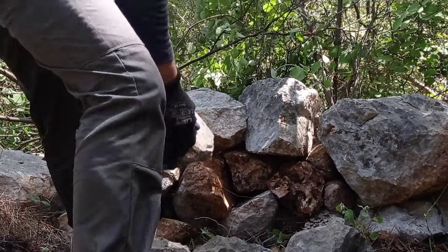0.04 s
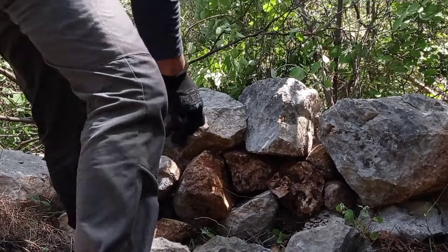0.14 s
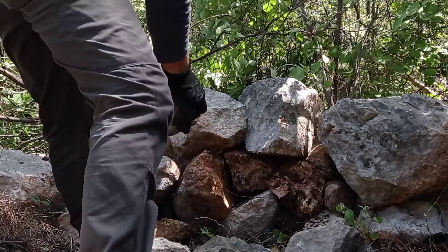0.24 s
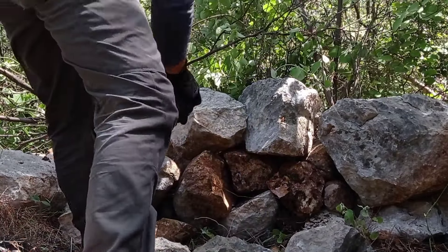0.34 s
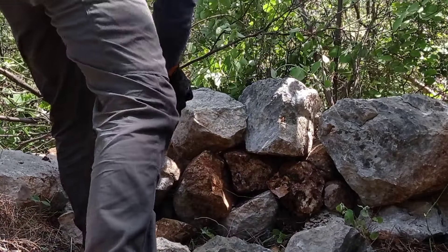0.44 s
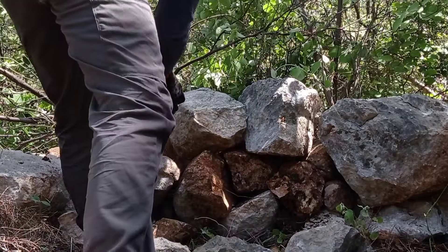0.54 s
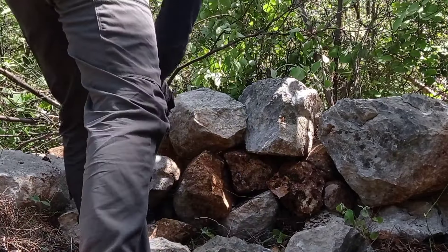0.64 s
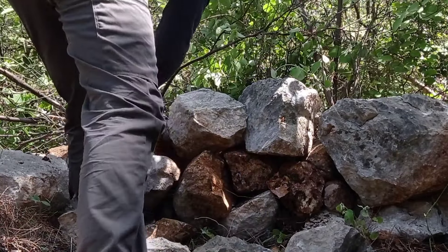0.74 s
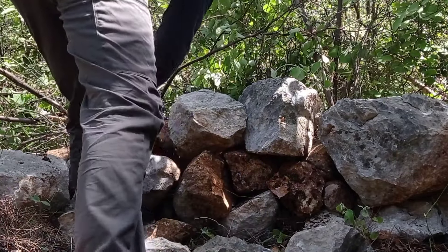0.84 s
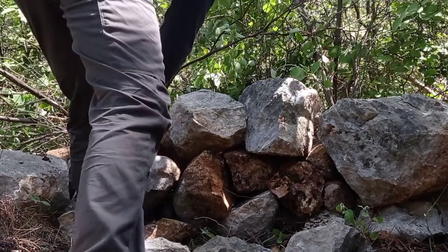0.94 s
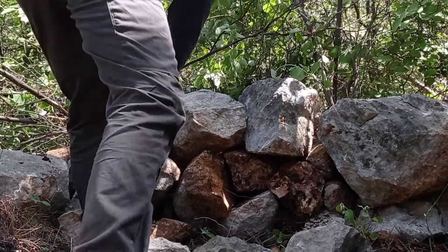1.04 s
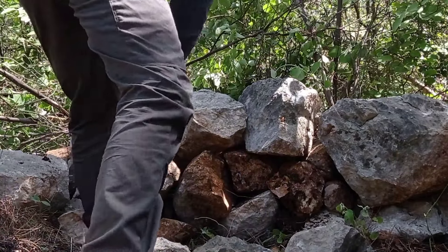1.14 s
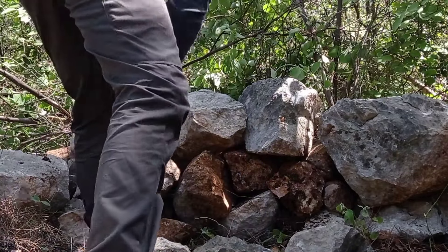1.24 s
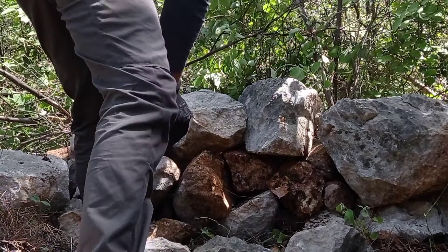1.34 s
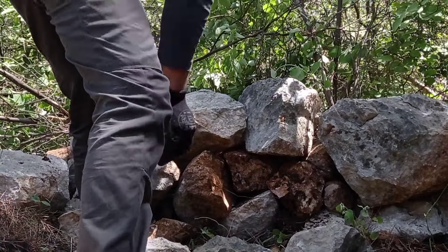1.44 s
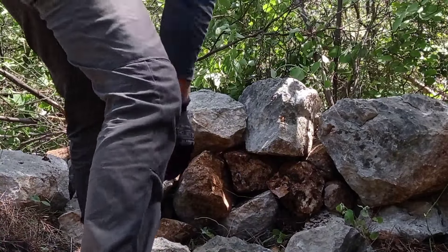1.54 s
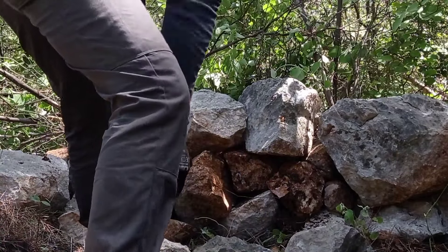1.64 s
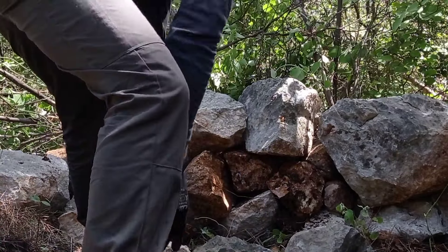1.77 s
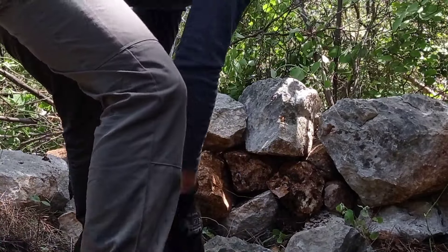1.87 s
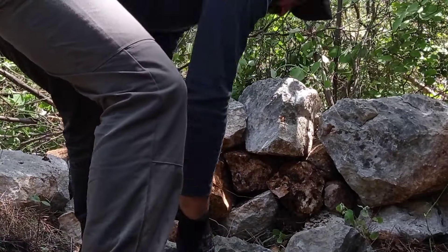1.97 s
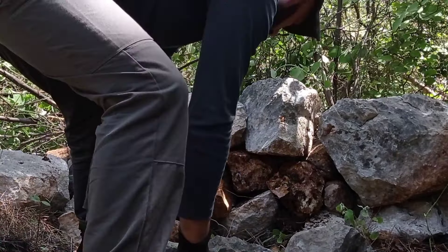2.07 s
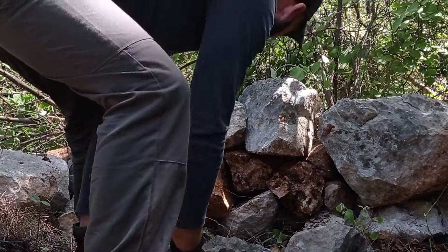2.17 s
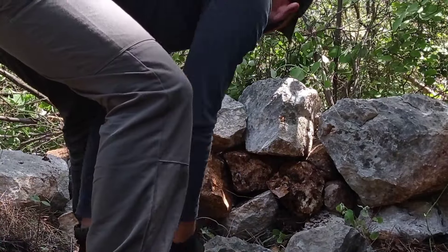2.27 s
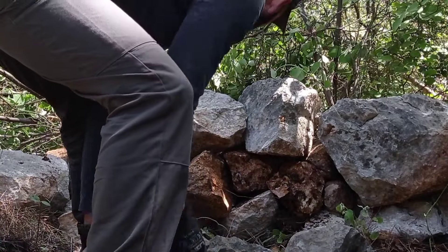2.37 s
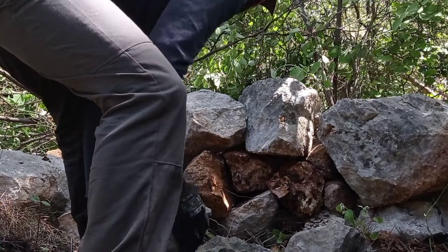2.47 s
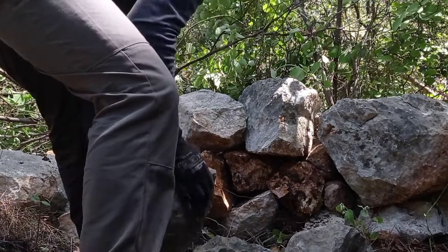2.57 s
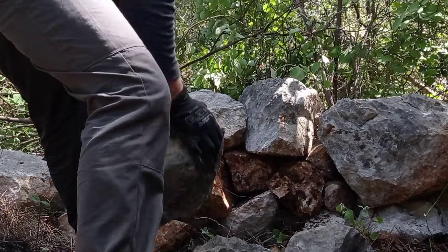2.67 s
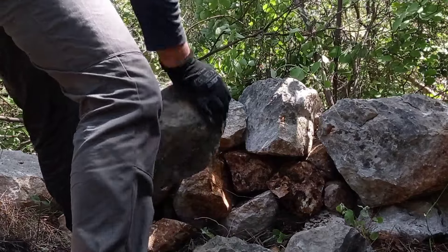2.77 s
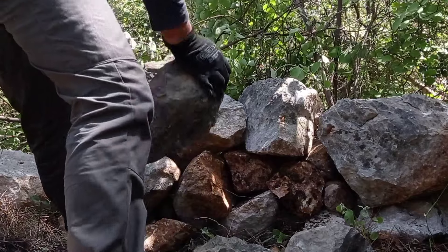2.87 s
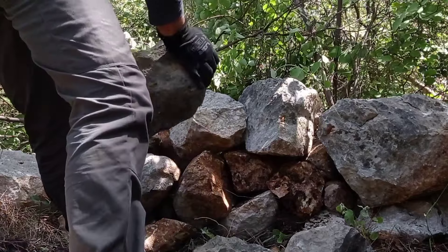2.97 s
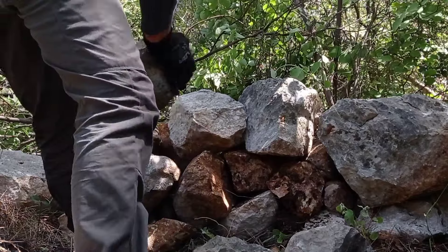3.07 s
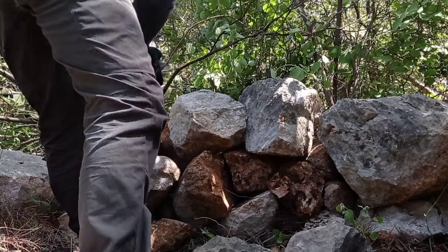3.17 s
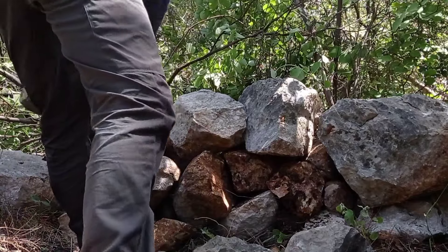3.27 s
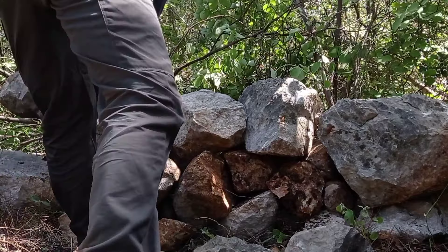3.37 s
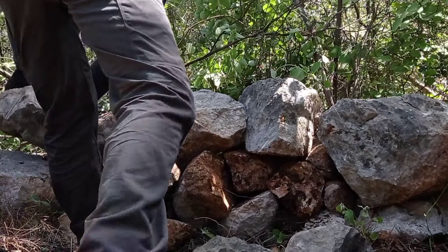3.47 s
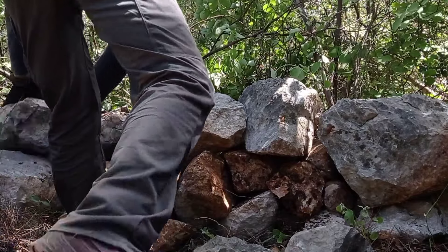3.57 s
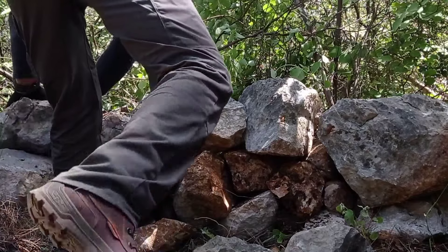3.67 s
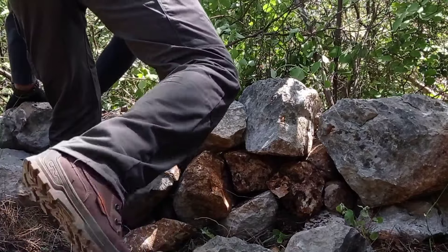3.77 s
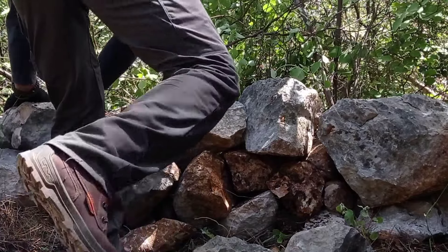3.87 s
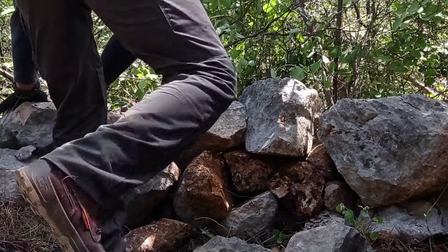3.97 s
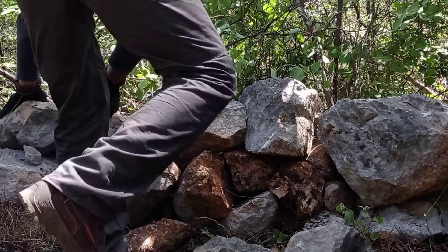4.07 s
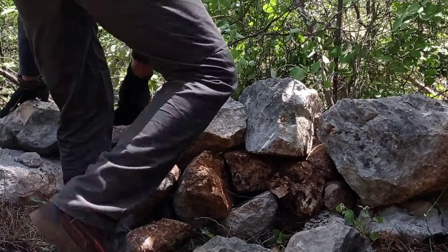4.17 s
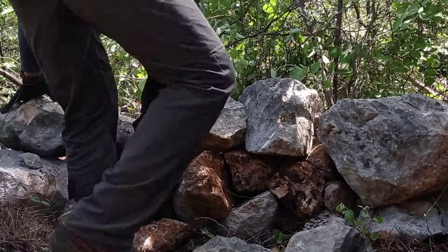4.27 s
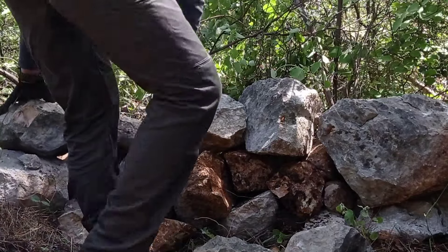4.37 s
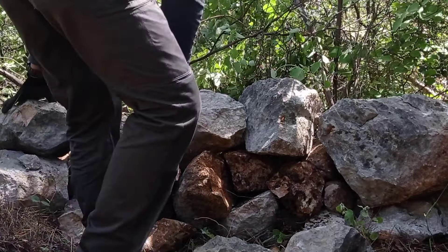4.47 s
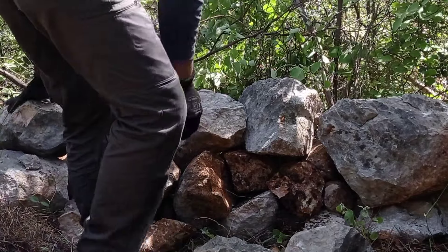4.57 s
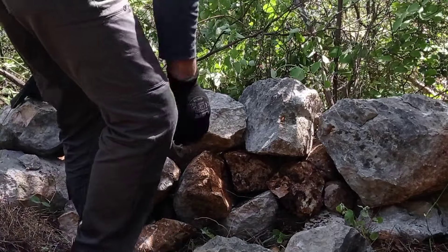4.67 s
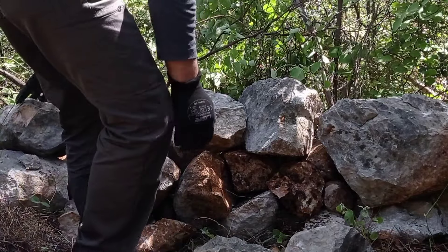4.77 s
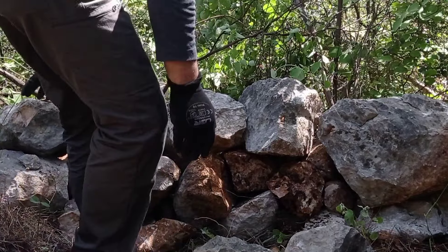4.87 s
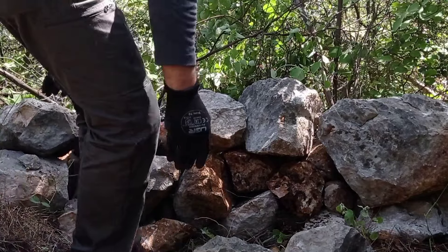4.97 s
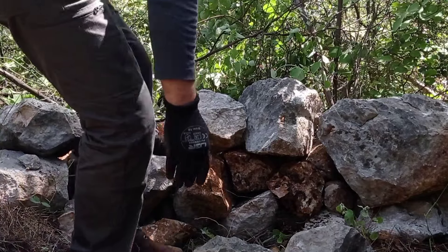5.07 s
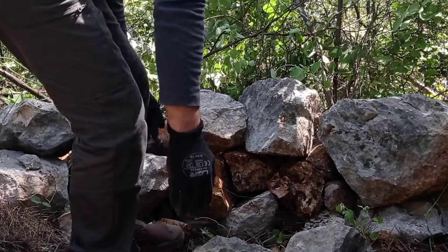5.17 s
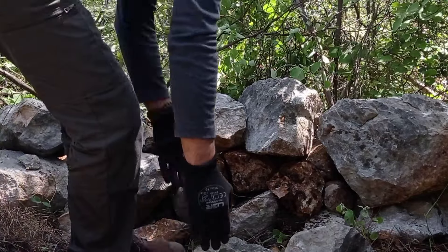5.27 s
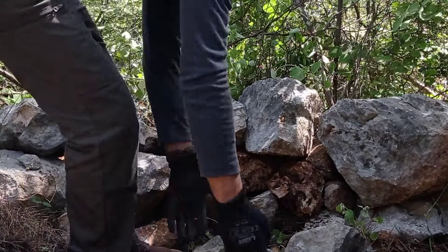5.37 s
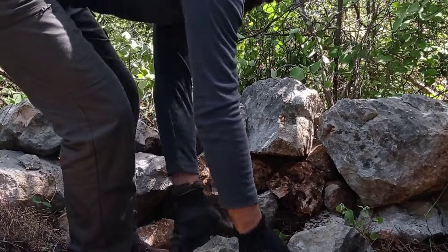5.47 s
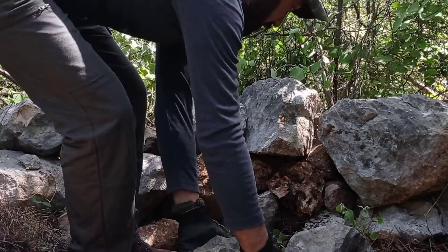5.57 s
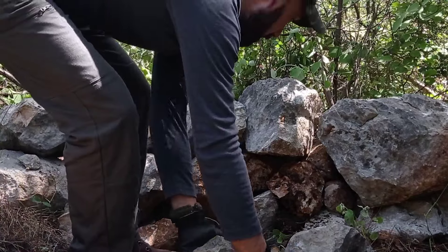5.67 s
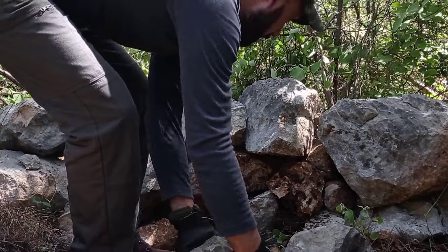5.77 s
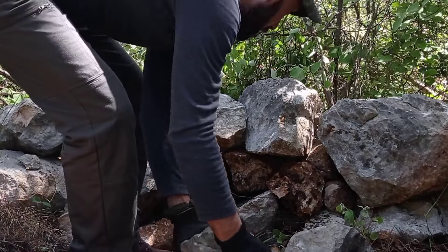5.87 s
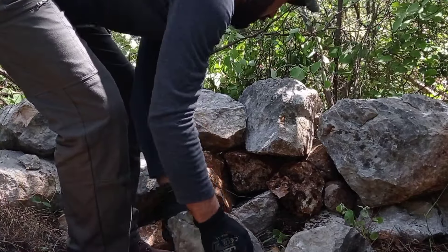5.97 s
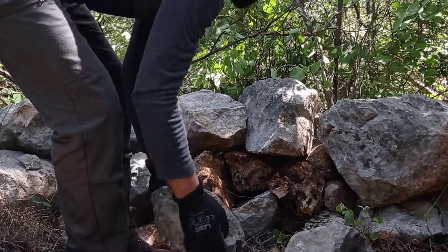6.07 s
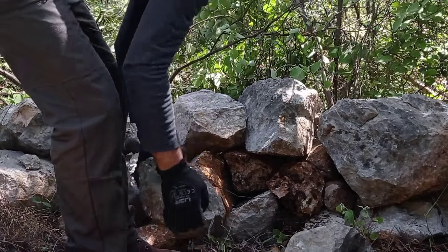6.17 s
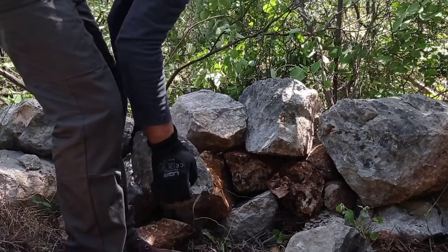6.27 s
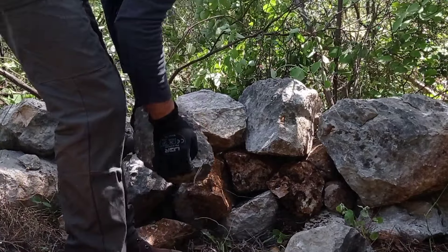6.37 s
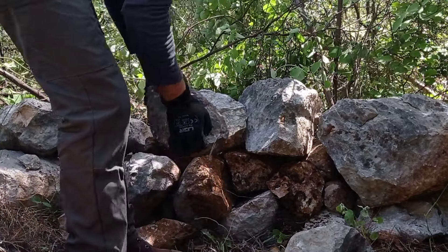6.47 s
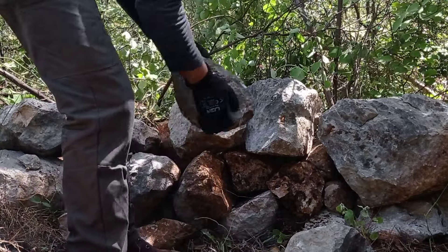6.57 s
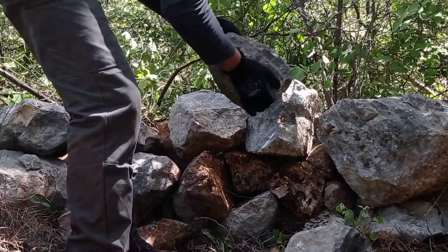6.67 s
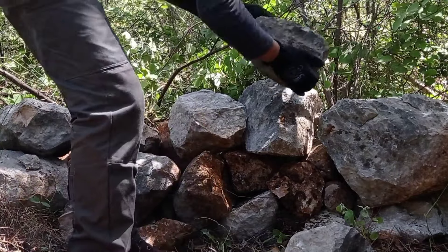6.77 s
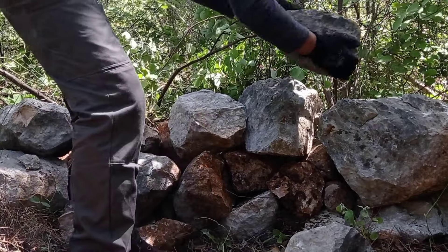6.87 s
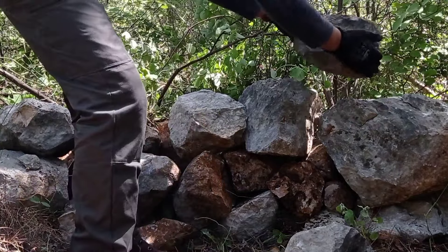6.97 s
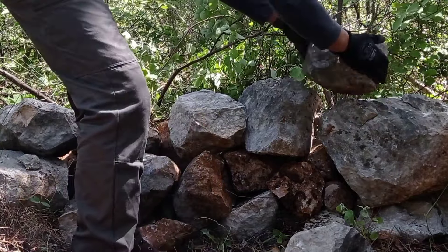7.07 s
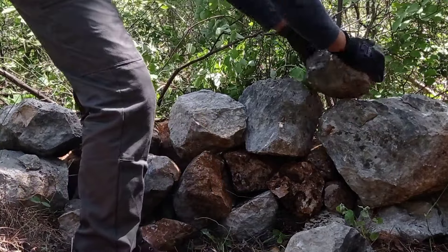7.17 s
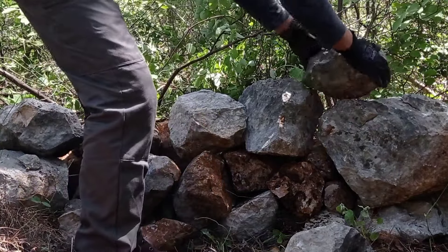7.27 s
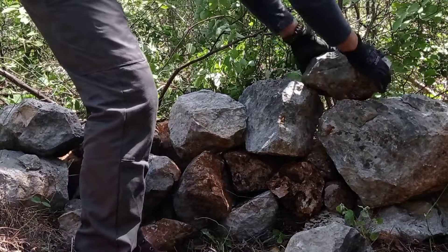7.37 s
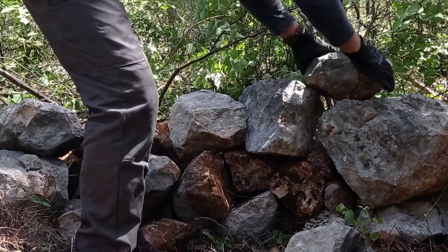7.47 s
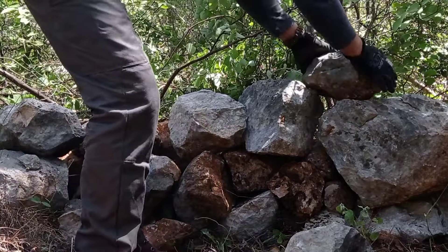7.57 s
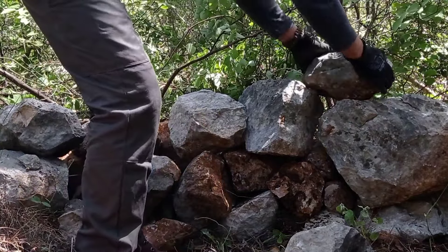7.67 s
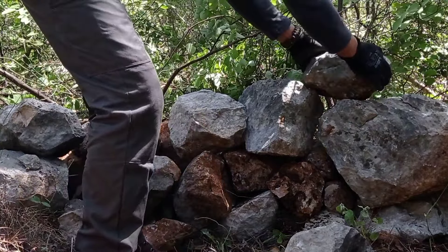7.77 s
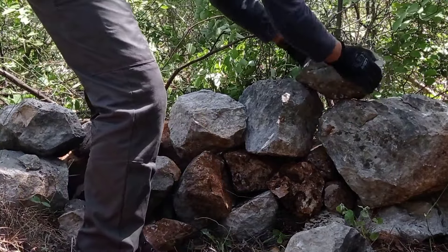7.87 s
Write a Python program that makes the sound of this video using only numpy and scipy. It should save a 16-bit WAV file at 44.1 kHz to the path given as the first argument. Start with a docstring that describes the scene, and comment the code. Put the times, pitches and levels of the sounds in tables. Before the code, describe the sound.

Three sharp stone-on-stone clacks with smaller settling knocks, amid soft crunching steps and faint bird whistles in a quiet wood.

```python
"""A dry-stone wall going up in a wood, heard on one microphone near the work, over the low hum of the air.
A heavy rock clacks down in the first second. Clothes rustle, twigs and grit snap under boots, and far off
one bird whistles a level note and another sings three thin phrases. At 3.5 s a second rock lands, tips on
its edges and settles. More steps and another whistle follow; from 7.1 s the last rock knocks into place."""
import sys
import numpy as np
from scipy import signal
from scipy.fft import rfft, irfft, next_fast_len
from scipy.io import wavfile
from scipy.ndimage import uniform_filter1d, map_coordinates

SR = 44100
rng = np.random.default_rng(int(sys.argv[2]) if len(sys.argv) > 2 else 0)


def wrap_up_sound(samples):
    """Save the sound to the file named by the first command line argument, as 16-bit audio."""
    columns = np.atleast_2d(samples).T
    # keep every value between -1 and 1, then stretch to whole-number steps
    tamed = np.clip(columns, -1, 1)
    steps = np.round(tamed * 32767).astype(np.int16)
    wavfile.write(sys.argv[1], SR, steps)


N = 349624

# Stone on stone, near the microphone. Each row: start in seconds, strength in dB, main ring in Hz,
# then the weight behind the blow, the hardness of the contact and the grit caught in it, all in dB.
KNOCKS = [(0.7398, -10, 1100, -11, 13, 16), (0.7432, 14.5, 850, -6, 13, 8.5),
          (0.8101, 23, 988.4, -6, -2.5, -10.5), (.834, 4.5, 598, 0, -1.5, -3), (3.531, 17, 800, 3, 2, 2),
          (3.555, 17, 966, -10, 4.5, 11), (3.586, 5.5, 278, 6, 5, -1), (3.6283, 2.5, 756, 2.5, -3, -19),
          (3.727, 9, 724, 1, -4, -5), (4.414, 4, 660, -2, 0, -11), (4.439, -15.5, 557, 11.5, 2.5, 3),
          (5.872, -14.5, 554, 1.5, 3, 12.5), (7.1176, 18.5, 298, -2, 10.5, -3.5),
          (7.1445, -2.5, 490, 1.5, 4, -5), (7.199, -15, 600, 1, 4.5, 7),
          (7.3866, 6.5, 661, -4, -5.5, -20.5), (7.43, -14, 485, 9, -6, 12),
          (7.451, -11.5, 605, 6.5, -10, 9), (7.79, -17, 666, -1.5, -12, 1),
          (7.831, -14, 520, 0.5, -15.5, -6), (7.877, -6.5, 680, -1.5, -17, 8.5),
          (7.904, 1.5, 550, -5, 5.5, -9), (7.9103, -2, 270, -6.5, 3, -11)]
# The spectrum of an average blow. Each row: frequency in Hz, level in dB.
BLOW_SPECTRUM = [(25, -48), (50, -23.5), (78, -4), (125, 2), (310, -.5), (590, 2), (950, -1.5), (1120, -5),
                 (1450, -12), (1850, -17), (3500, -30), (6400, -28.5), (8200, -38), (12500, -54),
                 (15500, -46)]
# How weight, hardness and grit colour it. Each row: frequency in Hz, dB gained per dB of that quality.
WEIGHT_TILT = [(125, 1.52), (310, 0.12), (590, 0.33), (950, -0.87), (1850, 0.02), (3500, 0)]
HARDNESS_TILT = [(1000, 0), (1450, 0.6), (1850, 0.9062), (3500, 1), (6400, 0)]
GRIT_TILT = [(1850, 0), (3500, 0.81), (6400, 1), (15500, 0.52)]


def stones():
    """Each contact is a heavily damped pulse; weight gives a thud, hard faces a crack, grit a fizz."""
    out = np.zeros(N)
    hz, blow_db = np.transpose(BLOW_SPECTRUM)
    for start, db, ring_hz, weight, hardness, grit in KNOCKS:
        colour = blow_db + weight * along(WEIGHT_TILT, hz)
        colour += hardness * along(HARDNESS_TILT, hz)
        colour += grit * along(GRIT_TILT, hz)
        blow = pulse(list(zip(hz, db + colour)))
        blow = signal.fftconvolve(blow, crush(seconds=.0036, rough_hz=1490))
        blow = signal.fftconvolve(blow, rock_ring(ring_hz, main_db=1.5, high_db=-5.5, neighbour_db=-4.5))
        rattle_db = -8 - .29 * db  # firm blows seat the rock and rattle less
        add(out, start, outdoors(blow, ground=.4, wall_db=rattle_db, wood_db=-28))
    return out


# The brief ring of a hand-sized rock. Each row: frequency in Hz, relative level in dB, t60 in seconds.
ROCK_MODES = [(2450, -6, .015), (2917, 2.5, .022), (3720, 1.5, .02), (4400, -3.5, .02), (4700, -5.5, .02),
              (5800, -2.5, 0.018), (6340, -1, 0.012)]


def rock_ring(main_hz, main_db, high_db, neighbour_db):
    """A blow plus the rock's main resonance, its high modes and the low modes of the rocks it leans on."""
    t = np.arange(SR // 12) / SR

    def mode(hz, db, t60):
        decay = amp(db - 60 * t / t60)
        return decay * np.cos(2 * np.pi * hz * t) * 2 * np.log(1000) / (t60 * SR)  # resonance peaks at db

    ring = mode(main_hz, main_db, t60=18 / main_hz)  # dies in 18 cycles
    for hz, db, t60 in ROCK_MODES:
        ring += mode(hz, high_db + db + 2 * rng.standard_normal(), t60)
    for hz in np.geomspace(260, 2000, num=7) * np.exp(.11 * rng.standard_normal(7)):
        ring += rng.choice([-1, 1]) * mode(hz, neighbour_db, t60=.054)
    ring[0] += 1  # the blow itself
    return ring


def crush(seconds, rough_hz, size=2048):
    """Contact force: one clean push below rough_hz, a burst of crumbling grains above."""
    t, hz = np.arange(size) / SR, np.fft.rfftfreq(size, 1 / SR)
    burst = rng.standard_normal(size) * np.exp(-t / seconds)
    grains = rfft(burst / np.linalg.norm(burst))
    push = np.exp(-2j * np.pi * hz * seconds / 2)
    rough_share = 1 / (1 + (rough_hz / (hz + 1)) ** 4)
    return irfft(np.sqrt(1 - rough_share) * push + np.sqrt(rough_share) * grains)[:size // 2]


# Breaks underfoot. Each row: start in seconds, strength in dB, thinness (fizz over crack) in dB.
SNAPS = [(1.7455, -37.5, 14.5), (2.007, -36.5, -11.5), (2.07, -32.5, -9.5), (2.116, -25, -3.5),
         (3.619, -23.5, -11), (3.681, -26.5, 3.5), (3.815, -34.5, 12), (3.9295, -15.5, -4.5),
         (3.937, -17.5, -2.5), (4.0104, -21, -6.5), (4.029, -20, -9), (4.0345, -20.5, -12),
         (4.129, -29, -5.5), (5.002, -35.5, 10), (5.2536, -30.5, 6.5), (5.298, -20, 13), (6.006, -29, -7.5),
         (6.38, -35.5, 2), (6.706, -34.5, 10), (7.6376, -26.5, 5)]


def snaps():
    """Dry twigs and crumbs of rock break with thin, bright ticks."""
    out = np.zeros(N)
    for start, db, thinness in SNAPS + crumbs():
        crack, fizz = db - thinness / 2, db + thinness / 2
        top = fizz + np.clip(thinness, -8, 8)  # thin twigs reach higher than thick ones
        tick = pulse([(100, crack - 18), (700, crack - 14), (1500, crack - 1), (3800, crack + 1),
                      (6500, fizz + 2), (8500, fizz - 7), (12500, top - 26), (15500, top - 17)])
        tick = signal.fftconvolve(tick, crush(seconds=.0045, rough_hz=894))
        add(out, start, outdoors(tick, ground=.14, wall_db=-13.5, wood_db=-19))
    return out


def crumbs(per_second=2.7, db=-44.5, spread_db=2, max_thinness_db=11):
    """Faint chance ticks, likelier the more the body moves: rows like those of SNAPS."""
    effort = np.cumsum(movement())
    draws = rng.random((64, 3))[:round(per_second * N / SR)]
    rows = []
    for when, size, thin in draws:
        start = np.searchsorted(effort, when * effort[-1]) / SR
        rows.append((start, db + spread_db * (2 * size - 1), thin * max_thinness_db))
    return rows


# Boots and gloves scraping by the wall. Each row: start and length in seconds, relative level in dB.
SCUFFS = [(0.693, .06, -65), (0.738, 0.19, -58), (1.333, 0.045, -75.5), (1.415, 0.049, -73),
          (1.683, 0.08, -67.5), (1.966, .28, -61), (3.43, .34, -63), (4.099, 0.13, -66.5),
          (4.379, .2, -68.5), (4.61, 0.078, -66.5), (5.24, 0.097, -64), (5.822, .08, -66),
          (6.497, 0.18, -73.5), (6.984, 0.24, -63.5), (7.426, 0.048, -71.5)]
# Weight shifting on soil and loose rock. Each row: start and length in seconds, level in dB, pitch in Hz.
SHIFTS = [(0, 0.28, -68.5, 297), (2.292, 1.22, -63, 107.4), (3.541, 0.38, -54, 123),
          (3.979, 0.86, -61.5, 118), (5.131, .5, -58.5, 279), (5.513, 0.24, -61, 139),
          (7.433, 0.072, -57, 140), (7.812, 0.19, -51.5, 246)]
# The crackle of needles and grit. Each row: frequency in Hz, relative level in dB.
LITTER_SPECTRUM = [(200, -0.5), (1000, -2), (2200, -2.5), (4000, 1), (5200, -1.5), (6600, 0.5),
                   (8500, -12.5), (13000, -26.5), (15500, -17)]


def footwork():
    """Soles grind the litter into crackle; shifting weight makes the ground rumble softly."""
    scrape, rumble = np.zeros(N), np.zeros(N)
    for start, seconds, db in SCUFFS:
        add(scrape, start, amp(db + 1) * swell(seconds) ** .74)
    for start, seconds, db, hz in SHIFTS:
        press = np.zeros(N)
        add(press, start, amp(db) * swell(seconds))
        hollow = [(hz / 4, -28), (hz * .7, -4), (hz, 0), (hz * 1.25, -3),
                  (hz * 1.8, -18), (hz * 5, -36), (hz * 20, -70)]
        rumble += press * coloured(rng.standard_normal(N), hollow)
    grains = crackle(rate=4300, spread_db=3) * amp(3 * wobble(60))  # grains come in clumps
    crunch = scrape * patchy(coloured(grains, LITTER_SPECTRUM), depth_db=3.5)
    return rumble + outdoors(crunch, ground=.3, wall_db=-10.5, wood_db=-10.5)[:N]


# The hiss of work clothes. Each row: frequency in Hz, relative level in dB.
FABRIC_SPECTRUM = [(300, -8.5), (1200, -2.5), (3000, -4.5), (5000, -1), (6400, 4.5), (8000, -3),
                   (10000, -15.5), (13000, -23), (15500, -18)]


def cloth():
    """Fabric rubs in uneven little strokes, dull and bright folds taking turns."""
    strokes = amp(2.6 * wobble(18))
    friction = rng.standard_normal(N) + .5 * crackle(rate=1500, spread_db=2)
    bright = amp(3) * coloured(friction, FABRIC_SPECTRUM)
    dull = amp(-8 + 5.4 * wobble(16)) * coloured(crackle(rate=3000, spread_db=2.5), LITTER_SPECTRUM)
    return movement() * patchy(strokes * (bright + dull), depth_db=3)


# Trousers and sleeves in lifting, stepping and lifting again.
# Each row: one move, as points of time in seconds and level in dB.
MOVES = [
    [(1.3, -87), (2.04, -86.5), (2.18, -81), (2.33, -83), (2.63, -80.5), (3.26, -85), (3.33, -85)],
    [(3.36, -84.5), (3.46, -82.5), (3.6, -74), (3.93, -81), (4.48, -73.5), (5.28, -82.5), (5.48, -75)],
    [(5.8, -77.5), (6.02, -85.5), (6.38, -89), (6.58, -79), (7.2, -78), (7.58, -88.5), (7.93, -85)],
]


def movement():
    """How strongly the body moves, as the gain of its rustle."""
    t = np.arange(N) / SR
    return sum(amp(np.interp(t, *np.transpose(move), left=-120, right=-120)) for move in MOVES)


# A rising note and a falling hook. Each row: seconds into the phrase, pitch in Hz, relative level in dB.
PHRASE = [(0, 4400, -18), (.06, 5100, 0), (.155, 4850, -10), (.165, 4900, -40), (.17, 6500, -40),
          (.185, 6150, -1), (.26, 5550, 1), (.285, 4200, 1), (.305, 3750, 1), (.335, 4400, -2),
          (.35, 4600, -25)]
# The small bird's phrases. Each row: start in seconds, relative level in dB.
SONG = [(1.861, -92.5), (2.29, -65), (2.735, -70.5)]
# A second bird's level notes. Each row: start and length in seconds, pitch in Hz, relative level in dB.
WHISTLES = [(1.762, .23, 1924, -81), (5.278, 0.13, 1947, -73)]


def birds():
    """Two birds whistle far from the microphone, their thin tones blurred by the trees."""
    times, hz, db = np.transpose(PHRASE)
    t, direct = np.arange(int(times[-1] * SR)) / SR, np.zeros(N)
    for start, level in SONG:
        pitch = np.interp(t, times, hz) * (1 + .012 * wobble(300)[:len(t)])
        envelope = amp(level + np.interp(t, times, db))
        add(direct, start, envelope * np.sin(2 * np.pi * np.cumsum(pitch) / SR))
    for start, seconds, note_hz, level in WHISTLES:
        envelope = amp(level) * swell(seconds)
        envelope *= amp(2.4 * wobble(35)[:len(envelope)] - 3)  # the note flutters
        pitch = note_hz * (1 + .013 * wobble(150)[:len(envelope)])
        add(direct, start, envelope * np.sin(2 * np.pi * np.cumsum(pitch) / SR))
    blurred = signal.fftconvolve(direct, tail([(2000, .67), (7000, .38)], seconds=.88))[:N]
    return .65 * direct + .7 * blurred


# The air all around the microphone. Each row: frequency in Hz, relative level in dB.
AIR_SPECTRUM = [(20, -22), (45, -13), (75, 0.5), (120, -0.5), (230, -15.5), (310, -8), (440, -15),
                (620, -12.5), (1150, -26.5), (2300, -31.5), (5000, -35.5), (6500, -29), (9500, -45),
                (15500, -49.5)]


def air():
    """The low, slowly wavering hush of the wooded slope."""
    level = amp(-66.5 + 1.5 * wobble(3))
    return level * patchy(coloured(rng.standard_normal(N), AIR_SPECTRUM), depth_db=4)


# Scatter in the nearby wall, and echo from the far trees. Each row: frequency in Hz, t60 in seconds.
WALL_DECAY = [(100, 0.24), (400, 0.11), (1000, .06), (3000, .05), (7000, 0.11), (15000, 0.018)]
WOOD_DECAY = [(100, .17), (500, .55), (1100, .43), (3000, .45), (7000, .35), (15000, .2)]


def outdoors(x, ground, wall_db, wood_db):
    """Sound reaches the microphone directly, off the rock beneath, and by way of the wall and trees."""
    path = amp(wood_db) * tail(WOOD_DECAY, seconds=1)
    add(path, 0, amp(wall_db) * tail(WALL_DECAY, seconds=.5))
    path[0] += 1
    bounce_s = .0021 * rng.uniform(.7, 1.3)  # varies from spot to spot
    path[round(SR * bounce_s)] += ground
    return signal.fftconvolve(x, path / np.linalg.norm(path))


def tail(decay, seconds):
    """A noise tail of energy 1, each frequency dying at its own speed."""
    hz, t, bands = signal.stft(rng.standard_normal(int(seconds * SR)), SR, nperseg=256)
    x = signal.istft(bands * amp(-60 * t / along(decay, hz)[:, None]), SR, nperseg=256)[1]
    x *= 1 - np.exp(-np.arange(len(x)) / SR / .0015)  # soft onset
    return x / np.linalg.norm(x)


def pulse(spectrum, size=4096):
    """The most compact causal pulse with this spectrum."""
    cepstrum = irfft(np.log(amp(along(spectrum, np.fft.rfftfreq(size, 1 / SR)))))
    cepstrum[1:size // 2] *= 2
    cepstrum[size // 2 + 1:] = 0
    return irfft(np.exp(rfft(cepstrum)))


def coloured(x, spectrum):
    """x through a spectrum of (Hz, dB) points, at rms 1."""
    size = next_fast_len(N + 8192)
    gain = amp(along(spectrum, np.fft.rfftfreq(size, 1 / SR)))
    return unit(irfft(rfft(x, size) * gain, size)[:N])


def patchy(x, depth_db):
    """x with gains that drift from band to band and moment to moment, at rms 1."""
    bands = signal.stft(x, nperseg=1024)[2]
    drift = uniform_filter1d(rng.standard_normal(bands.shape), size=5, axis=0)
    drift = uniform_filter1d(drift, size=7, axis=1)
    return unit(signal.istft(bands * amp(depth_db * unit(drift)), nperseg=1024)[1][:N])


def crackle(rate, spread_db):
    """Random tiny impulses of uneven size, about rate a second, at rms 1."""
    hits = rng.random(N) < rate / SR
    return unit(hits * rng.standard_normal(N) * amp(spread_db * rng.standard_normal(N)))


def wobble(rate):
    """A smooth random curve, rate knots a second."""
    return map_coordinates(rng.standard_normal(int(N * rate / SR) + 4), [np.arange(N) * rate / SR])


def swell(seconds):
    """A smooth rise and fall."""
    return np.sqrt(np.abs(np.hanning(max(int(seconds * SR), 2))))


def along(points, hz):
    """Interpolate (Hz, value) points on a log axis."""
    point_hz, values = np.transpose(points)
    return np.interp(np.log(hz + 1), np.log(point_hz + 1), values)


def add(track, start, x):
    """Mix x into the track from start seconds on."""
    i = max(round(start * SR), 0)
    track[i:i + len(x)] += x[:max(len(track) - i, 0)]


def amp(db):
    return 10 ** (np.asarray(db) / 20)


def unit(x):
    return x / np.sqrt(np.mean(x ** 2) + 1e-20)


def scene():
    """The work at the wall and the wood behind it, in mono."""
    return (stones() + footwork() + cloth() + birds() + air() + snaps())[None]


def record(dry, top_hz=15900):
    """The microphone channel keeps nothing above its band limit."""
    size = next_fast_len(N + 8192)
    passband = np.fft.rfftfreq(size, 1 / SR) < top_hz
    return irfft(rfft(dry, size) * passband, size)[:, :N]


dry = scene()
out = record(dry)
wrap_up_sound(out)
```